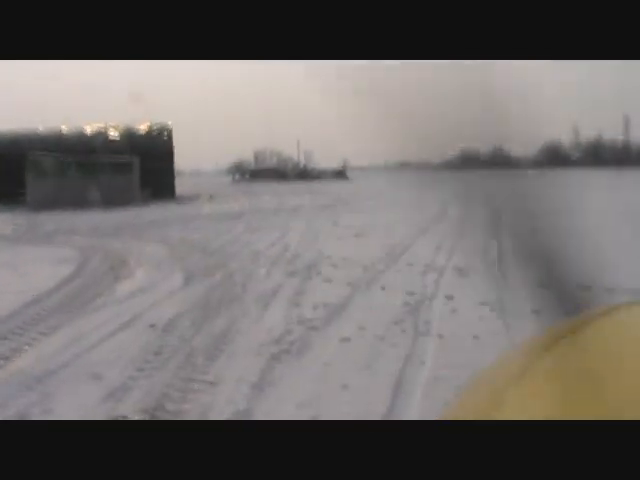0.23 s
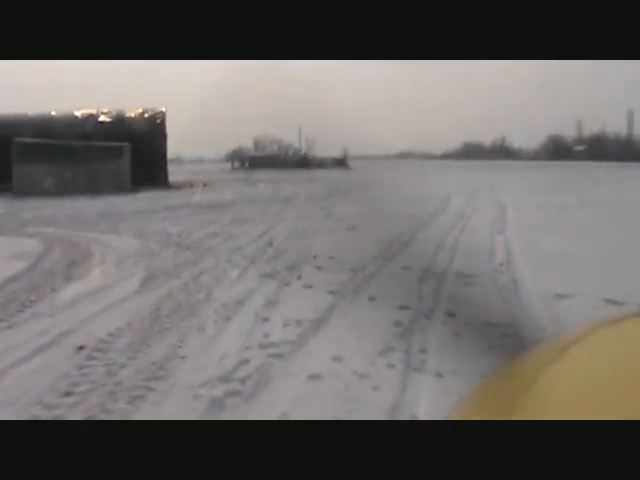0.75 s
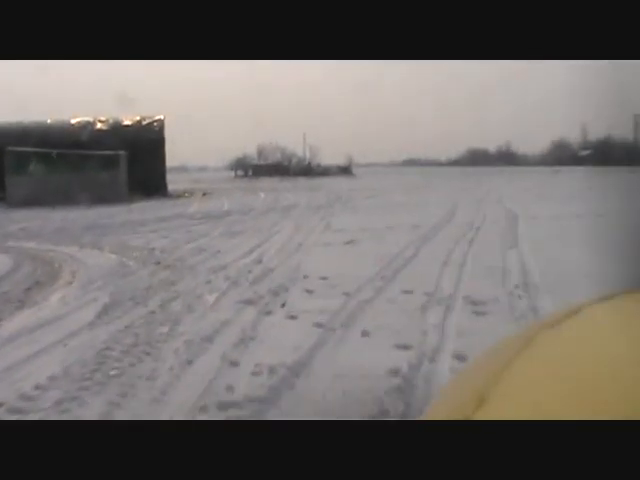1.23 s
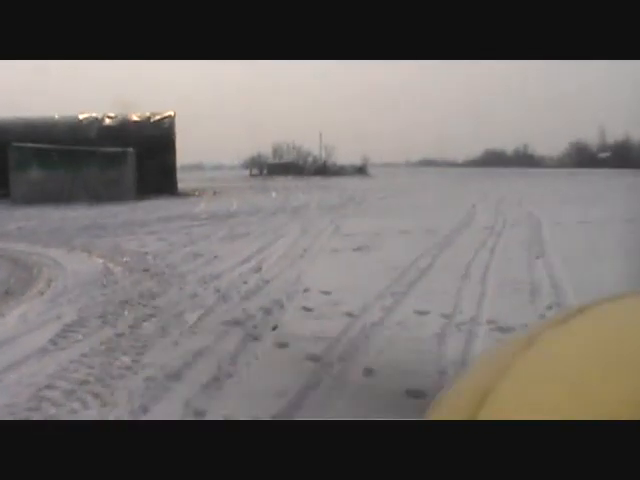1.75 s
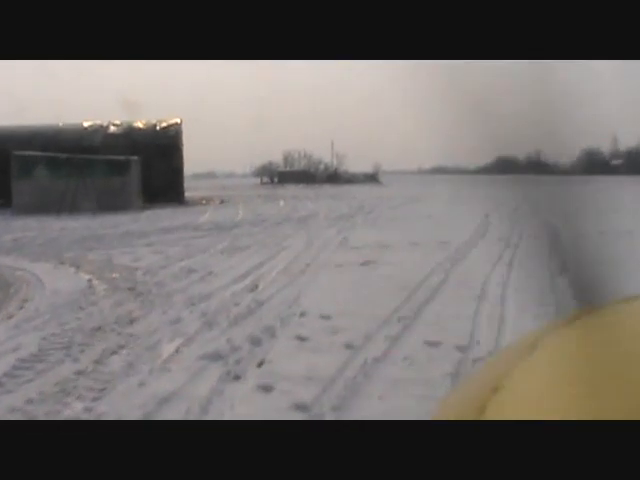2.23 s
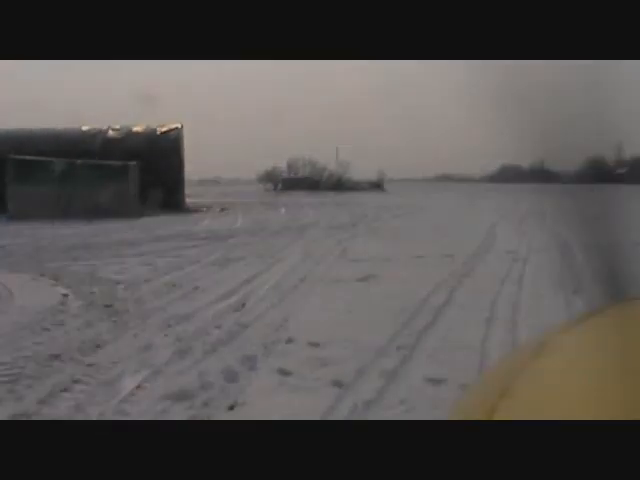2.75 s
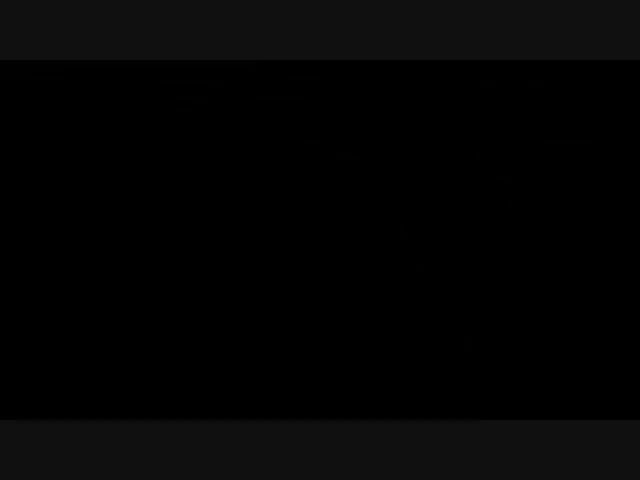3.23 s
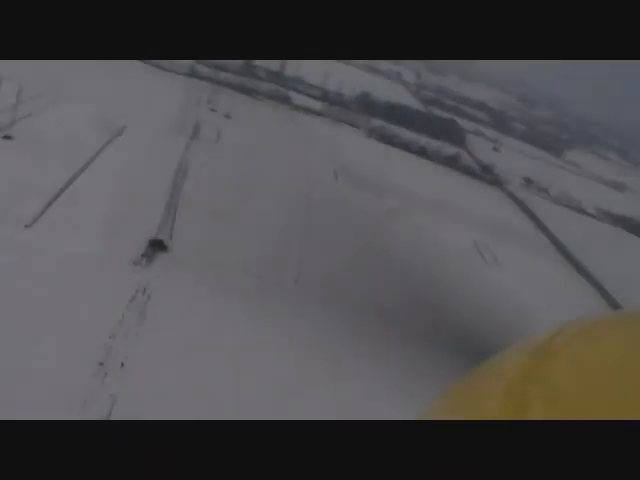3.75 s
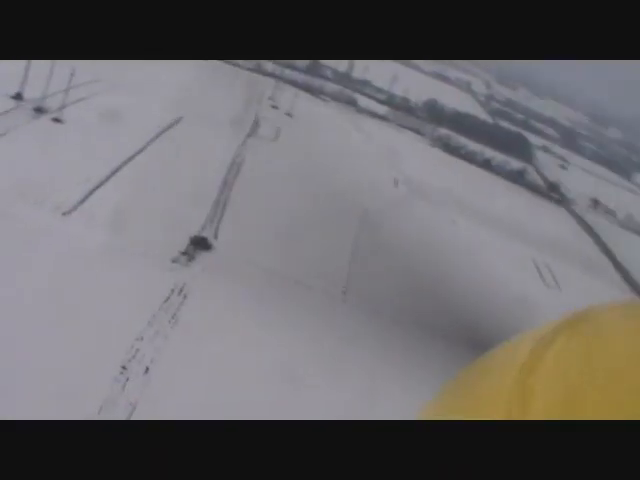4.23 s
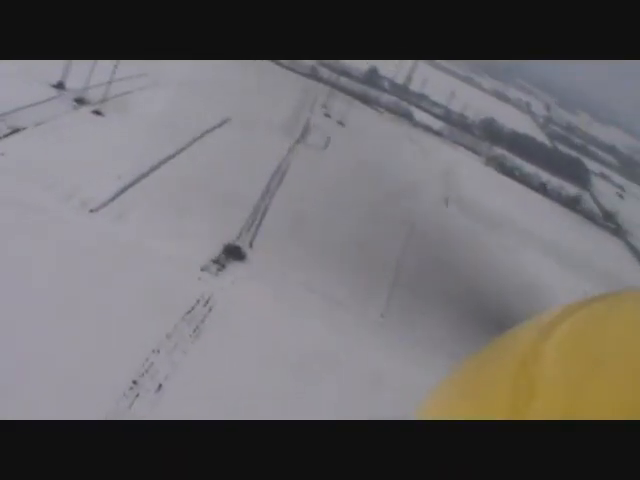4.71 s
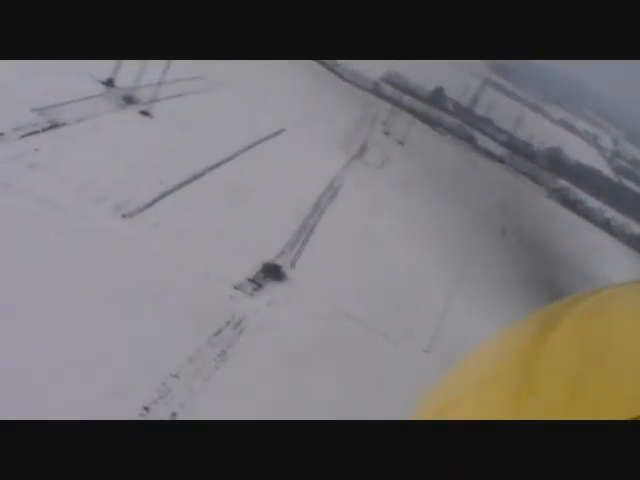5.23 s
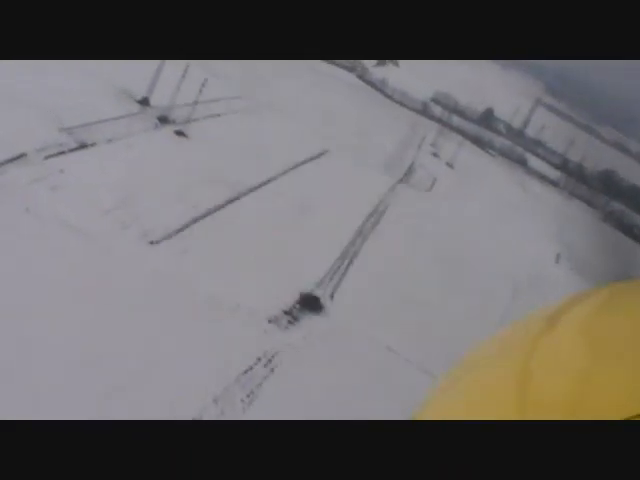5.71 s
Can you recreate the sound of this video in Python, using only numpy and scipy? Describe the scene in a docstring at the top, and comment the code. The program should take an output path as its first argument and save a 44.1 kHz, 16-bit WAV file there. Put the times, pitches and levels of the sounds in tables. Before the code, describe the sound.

A small ultralight aircraft engine heard very close, from its nose, outdoors. From 0 to about 1.4 s it runs at steady taxi power: a low buzzing drone with rapid, dry, hollow knocks and ringing cowling clatter, over throbbing propeller wash and a soft grainy hiss. Its pitch dips slightly, then creeps up. A loose metal fitting rattles in short, bright, irregular ticks and bursts; a very short high squeak slips in near 0.8 s. From 1.4 s everything gradually fades, with a faint thin whistle around 2.8 to 3.2 s. At about 3.2 s there is roughly a quarter second of silence. From 3.4 s the engine fades back in, clearly higher pitched and at climb power, reaching full level near 5.4 s. The rushing air is now stronger and smoother, masking most of the clatter, with softer, sparser rattles continuing until the end at about 6 s.

```python
"""Engine of an ultralight aircraft, heard from its nose: taxiing over snow, then climbing at higher power.
Firing-locked tones make the drone; knocks and cowling resonances at the firing rate make the clatter.
Coloured noise makes the propeller wash and air hiss; a loose fitting rattles as resonant noise bursts.
The taxi fades and has one scrape and a thin late whistle; after a brief silence the climb fades in."""
import sys
import numpy as np
from scipy import signal
from scipy.fft import rfft, irfft, next_fast_len
from scipy.io import wavfile
from scipy.ndimage import map_coordinates

SR = 44100
rng = np.random.default_rng(int(sys.argv[2]) if len(sys.argv) > 2 else 0)


def transcribe(signal):
    """Save signal, clipped to [-1, 1], as a 16-bit WAV file at the path in sys.argv[1]."""
    frames = np.atleast_2d(signal).T
    limited = np.clip(frames, -1, 1)
    pcm = np.round(limited * 32767).astype(np.int16)
    wavfile.write(sys.argv[1], SR, pcm)


N = 263276
TIME = np.arange(N) / SR  # s


def amp(db):
    """Decibels to gain."""
    return 10 ** (np.asarray(db) / 20)


def unit(x):
    """Scale to rms 1."""
    return x / np.sqrt(np.mean(x ** 2) + 1e-20)


def along(points, hz):
    """Interpolate (frequency [Hz], value) points on a log frequency axis."""
    point_hz, value = np.transpose(points)
    return np.interp(np.log(hz + 1), np.log(point_hz + 1), value)


def curves(rows):
    """One value per sample for each column after the time."""
    time_s, *columns = np.transpose(rows)
    return [np.interp(TIME, time_s, column) for column in columns]


def wobble(knots_per_s):
    """Smooth random curve: a spline through normal deviates."""
    knots = rng.standard_normal(int(N * knots_per_s / SR) + 4)
    return map_coordinates(knots, [TIME * knots_per_s])


def filtered(x, response):
    """Apply a complex frequency response by zero-padded FFT."""
    size = next_fast_len(N + SR // 2)
    hz = np.fft.rfftfreq(size, 1 / SR)
    return irfft(rfft(x, size) * response(hz), size)[..., :N]


def coloured(x, spectrum):
    """Shape x to a spectrum, 12 dB/octave down below it and 24 dB/octave above, at rms 1."""
    low_hz, high_hz = spectrum[0][0], spectrum[-1][0]

    def response(hz):
        below = np.minimum(hz / low_hz, 1) ** 2
        above = (high_hz / np.maximum(hz, high_hz)) ** 4
        return amp(along(spectrum, hz)) * below * above

    return unit(filtered(x, response))


def ringing(x, modes):
    """Sum of band-pass resonances of alternating sign, scaled to keep the power of white noise."""
    def body(hz):
        total = 0
        for k, (centre_hz, width_hz, db) in enumerate(modes):
            damping = 1j * hz * width_hz
            total = total + (-1) ** k * amp(db) * damping / (centre_hz ** 2 - hz ** 2 + damping)
        return total

    def response(hz):
        gain = body(hz)
        return gain / np.sqrt(np.mean(abs(gain) ** 2))

    return filtered(x, response)


def noise_pair(alike):
    """Left and right white noise with a given correlation at each frequency."""
    def mid_side(hz):
        angle = np.arccos(np.clip(along(alike, hz), -1, 1)) / 2
        return np.array([np.cos(angle), np.sin(angle)])

    mid, side = filtered(rng.standard_normal((2, N)), mid_side)
    return np.array([mid + side, mid - side])


def strokes(cycle, lag, sharp, scatter_db):
    """One smooth pulse per firing, lag in cycles, each of random size, at rms 1."""
    index = np.maximum(np.floor(cycle - lag + .5).astype(int) + 1, 0)
    size = amp(scatter_db * rng.standard_normal(N)[index])
    return unit(size * np.exp(sharp * np.cos(2 * np.pi * (cycle - lag))))


def bursts(events, rise_s, t60_s):
    """Envelope that swells and decays at each (time [s], level [dB]) event."""
    t = np.arange(SR // 4) / SR
    shape = (1 - np.exp(-(t / rise_s) ** 2)) * 1000 ** (-t / t60_s)
    time_s, db = np.transpose(events)
    hits = np.bincount(np.round(time_s * SR).astype(int), amp(db), N)[:N]
    return signal.fftconvolve(hits, shape / shape.max())[:N]


def drone(cycle, orders, waver_db, jitter_rad):
    """Tones locked to the crankshaft; uneven combustion makes each waver in level and phase."""
    total = 0
    for order, db in orders:
        level = amp(db + waver_db * wobble(11))
        quarter_order = np.round(order * 4) / 4
        jitter = jitter_rad * np.sqrt(quarter_order) * wobble(9)
        total = total + level * np.cos(2 * np.pi * quarter_order * cycle + jitter)
    return total


def airflow(cycle, air, wash, hiss, alike, throb, gust_db):
    """Uneven propeller wash, throbbing at the firing rate, under a finer, grainy hiss."""
    wash_db, hiss_db = curves(air)
    gust = wobble(55)
    beat = strokes(cycle, lag=0.47, sharp=throb, scatter_db=0.0)
    roar = coloured(noise_pair(alike) * beat * amp(gust_db * gust), wash)
    grain_db = .5 * gust_db * gust + 1.62 * wobble(200)
    fizz = coloured(noise_pair(alike) * amp(grain_db), hiss)
    eddies_per_s, eddy_db = 7, .5  # slow swell, drawn separately for wash and hiss
    wash_swell_db = eddy_db * wobble(eddies_per_s)
    hiss_swell_db = eddy_db * wobble(eddies_per_s)
    return amp(wash_db + wash_swell_db) * roar + amp(hiss_db + hiss_swell_db) * fizz


def recurring(cycle, alike, count):
    """Moving parts repeat the same noise every count firings, giving a comb of fine lines."""
    place = cycle % count * N / cycle[-1]
    return unit(np.array([map_coordinates(side, [place]) for side in noise_pair(alike)]))


def clatter(cycle, alike, knock_db, ring_db, sharp, steady):
    """Every firing gives a dry knock, alternately hard and soft, and keeps the cowling ringing."""
    # knock colour: (frequency [Hz], relative density [dB])
    knock_colour = [(1000, -12.5), (1250, -12.5), (1380, 14), (1450, -17), (1550, 11.5), (1640, 0),
                    (1730, -27), (1900, -17), (2700, -16.5), (3300, -12.5)]
    # cowling resonances: (centre [Hz], width [Hz], relative gain [dB])
    cowling = [(184, 71, 3), (334, 62, 3), (457, 71, -2), (605, 13, -4), (808, 28, 2), (839.4, 24, 9.5),
               (914, 95, -4), (1062, 83, -7.5)]
    knock_hz = 1550

    def machinery(count):  # steady = share of power that recurs
        repeated = recurring(cycle, alike, count)
        return np.sqrt(steady) * repeated + np.sqrt(1 - steady) * noise_pair(alike)

    ping = unit(np.sin(2 * np.pi * knock_hz * TIME + 1.5 * wobble(80)))
    alternation = 1 + .18 * np.sin(np.pi * cycle)
    blows = strokes(cycle, lag=.53, sharp=sharp, scatter_db=.7) * alternation
    scuff = coloured(machinery(count=2), knock_colour)
    knocks = blows * (amp(-2) * ping + amp(-6) * scuff)
    shakes = machinery(count=4) * strokes(cycle, lag=0.22, sharp=0.53, scatter_db=0.0)
    return amp(knock_db) * knocks + amp(ring_db) * unit(ringing(shakes, cowling))


def strikes(cycle):
    """(time [s], level [dB]) of each contact, in step with the engine, hardest mid-bout on average."""
    # rattling bouts, the shortest a single hard tick: (start [s], length [s], nominal level [dB])
    bouts = [(0.06, .01, -23), (0.181, .07, -19), (0.306, .07, -18.5), (0.467, .01, -21.5), (0.6, .07, -18),
             (0.722, .01, -14), (0.816, .01, -17.5), (0.880, .01, -21.5), (1.002, .17, -16),
             (1.371, .01, -12.5), (1.493, .10, -17), (1.641, .01, -18.5), (1.705, .07, -19),
             (1.825, .07, -18), (2.101, .04, -15.5), (2.224, .20, -18), (2.468, .01, -18),
             (2.623, .07, -18), (2.747, .01, -21.5), (2.838, .10, -17.5), (3.13, .01, -25),
             (3.44, .01, -16), (3.6, .04, -20), (3.705, .09, -18.5), (3.971, .12, -20.5),
             (4.211, .06, -19.5), (4.418, .06, -17.5), (4.658, .04, -20), (5.074, .06, -20.5),
             (5.34, .04, -22.5), (5.525, .06, -23), (5.758, .04, -16)]
    firings_per_strike = 2
    bout_edge_db, strike_scatter_db, graze_db = -1.5, 2.1, -14
    events = []
    for start_s, length_s, db in bouts:
        first, last = np.interp([start_s, start_s + length_s], TIME, cycle)
        hard = np.arange(first, last, firings_per_strike)
        # grazes: before, between and after the hard strikes
        soft = np.r_[first - firings_per_strike, hard[1:] - 1, hard[-1] + firings_per_strike]
        off_middle = (2 * np.arange(len(hard)) + 1) / len(hard) - 1
        level_db = db + np.r_[bout_edge_db * off_middle ** 2, np.full(len(soft), graze_db)]
        level_db = level_db + strike_scatter_db * rng.standard_normal(len(level_db))
        time_s = np.interp(np.r_[hard, soft], cycle, TIME)
        events += zip(time_s, level_db)
    return events


def rattle(cycle):
    """In each bout a loose fitting strikes every second firing, exciting its ring and a dry crack."""
    # fitting resonances: (centre [Hz], width [Hz], relative gain [dB])
    fitting_modes = [(3970, 180, 7.5), (4380, 84, 3.5), (4880, 340, -1.5), (5450, 71, 1.5), (6140, 590, 1),
                     (7570, 260, 0), (8020, 410, 0.5), (9430, 290, 1.5), (10010, 210, 0.5),
                     (11320, 570, 1.5), (11560, 360, 3), (12270, 300, -7), (13200, 600, -7.5),
                     (13740, 490, -12)]
    # crack response: (frequency [Hz], gain [dB])
    crack_colour = [(2000, -34.5), (5000, -11), (9000, -7.5), (11500, 3.5), (13000, 5), (16000, -10)]
    # left-right correlation: (frequency [Hz], correlation [-1..1])
    fitting_alike = [(4000, .1), (6000, 0.45), (8000, 0.34), (11000, 0.81)]
    hits = strikes(cycle)
    ticks = bursts(hits, rise_s=0.00098, t60_s=0.0042)
    tails = amp(-14.5) * bursts(hits, rise_s=0.0034, t60_s=0.04)
    chatter = amp(-32) * bursts(hits, rise_s=0.004, t60_s=0.35)
    chatter = chatter * strokes(cycle, lag=.06, sharp=3, scatter_db=6)
    envelope = ticks + tails + chatter
    # independent level wobbles vary the balance of ring and crack
    ring_gain = amp(-2.0 + wobble(30))
    ring = ring_gain * ringing(noise_pair(fitting_alike) * envelope, fitting_modes)
    crack_gain = amp(-3.5 + 0.78 * wobble(30))
    crack_noise = noise_pair(fitting_alike) * envelope
    crack = crack_gain * filtered(crack_noise, lambda hz: amp(along(crack_colour, hz)))
    return ring + crack


def scrape():
    """A short, high squeak of the fitting sliding on its seat: a resonant noise burst."""
    # slip: (time [s], level [dB])
    slips = [(0.772, -22)]
    rub = noise_pair([(11000, 0.59)]) * bursts(slips, rise_s=0.0033, t60_s=0.1)
    # (centre [Hz], width [Hz], relative gain [dB])
    return ringing(rub, [(9800, 1400, -16.5), (11600, 410, -8.5), (12800, 800, -18.0)])


def whistle():
    """Two thin tones with a shared slight pitch wander swell late in the taxi."""
    # tones: (mean frequency [Hz], level before swell [dB])
    whistle_tones = [(2912, -52), (4366, -49)]
    # swell: (time [s], gain [dB])
    whistle_swell = [(2.7, -28), (2.85, 8), (3.0, 3), (3.04, -12), (3.1, 2), (3.19, 9)]
    swell_db, = curves(whistle_swell)
    clock_s = TIME + np.cumsum(0.00097 * wobble(40)) / SR
    gain = amp(swell_db + 2 * wobble(32))
    return gain * sum(amp(db) * np.sin(2 * np.pi * hz * clock_s) for hz, db in whistle_tones)


def taxi(cycle, load_gain):
    """Lower power: a clear drone and a distinct clatter, with the scrape and whistle."""
    # airflow: (time [s], wash level [dB], hiss level [dB])
    taxi_air = [(0, -15, -35), (1.4, -15.8, -35.4), (3.1, -16.5, -35.5)]
    # wash and hiss colours: (frequency [Hz], relative density [dB])
    taxi_wash = [(20, -24), (32, -3.5), (48, -12), (77, -6.5), (100, 0.5), (190, -2), (300, -7), (400, -10),
                 (600, -10.5), (740, -19), (1000, -17.5), (1250, -23.5), (1650, -24.5), (2200, -45.5)]
    taxi_hiss = [(1200, -11), (1900, 3.5), (2300, 1), (2700, 2.5), (3050, 1.5), (3400, -2.5), (4000, -3.5),
                 (5200, -9), (7500, -12), (9000, -10), (11800, -13), (13000, -19), (14000, -17),
                 (16000, -29)]
    # left-right correlation: (frequency [Hz], correlation [-1..1])
    taxi_alike = [(30, .93), (70, 0.78), (130, 0.52), (300, 0.78), (600, 0.49), (1500, 0.65), (4000, 0.43),
                  (8000, 0.45)]
    # engine tones: (multiple of firing rate, level before load gain [dB])
    taxi_orders = [(.5, -43.5), (1, -16.5), (1.5, -27), (2, -20), (3, -29.5), (5, -33.5), (7, -44.5),
                   (8, -46.5), (9, -39.5), (10.5, -35.5), (11.75, -38.5), (16, -40.5), (21, -40.5)]
    air = airflow(cycle, taxi_air, taxi_wash, taxi_hiss, taxi_alike, throb=0.044, gust_db=2.0)
    knocking = clatter(cycle, taxi_alike, knock_db=-33.3, ring_db=-25.5, sharp=2.6, steady=.7)
    hum = drone(cycle, taxi_orders, waver_db=1.1, jitter_rad=0.093)
    return air + load_gain * (hum + knocking) + scrape() + whistle()


def climb(cycle, load_gain):
    """Higher power: the stronger airflow covers most of the clatter."""
    # airflow: (time [s], wash level [dB], hiss level [dB])
    climb_air = [(3.5, -15, -30), (4.5, -14, -28.5), (5.9, -15, -29.5)]
    # wash and hiss colours: (frequency [Hz], relative density [dB])
    climb_wash = [(20, -28), (33, -4), (60, -6), (100, -1.5), (170, -1), (330, -4.5), (400, -8.5),
                  (600, -10), (760, -19), (930, -17.5), (1250, -23.5), (1700, -33), (2300, -44.5)]
    climb_hiss = [(1500, -5), (1950, -3), (2400, -5), (2620, 0), (3100, -2), (3350, -8), (3950, -5),
                  (5300, -9.5), (6600, -9.5), (7550, -13), (8300, -10.5), (10200, -11.5), (11400, -16.5),
                  (12150, -13.5), (13200, -21), (16000, -23)]
    # left-right correlation: (frequency [Hz], correlation [-1..1])
    climb_alike = [(30, .93), (70, 0.83), (130, 0.38), (300, 0.79), (600, 0.52), (1500, 0.52), (4000, 0.43),
                   (8000, 0.48)]
    # engine tones: (multiple of firing rate, level before load gain [dB])
    climb_orders = [(.5, -34), (.75, -27), (1, -24), (1.5, -29.5), (2, -19.5), (2.25, -32), (7.5, -45),
                    (10.75, -38), (11, -38.5), (11.25, -34), (12, -46.5), (13, -44)]
    air = airflow(cycle, climb_air, climb_wash, climb_hiss, climb_alike, throb=.15, gust_db=0.48)
    knocking = clatter(cycle, climb_alike, knock_db=-38.5, ring_db=-33.5, sharp=0.76, steady=.45)
    hum = drone(cycle, climb_orders, waver_db=1.4, jitter_rad=.13)
    return air + load_gain * (hum + knocking)


def scene():
    """Taxi, a short silence, then climb, under a linear fade down and up."""
    # engine speed: (time [s], firing rate [Hz])
    firing_rate = [(0, 62.15), (0.3, 60.99), (0.6, 63.12), (0.9, 64.18), (1.3, 65.75), (1.7, 65.93),
                   (2.2, 65.1), (2.7, 65.79), (3.19, 65.98), (3.4, 77.31), (4.1, 75.58), (4.6, 75.91),
                   (5.2, 76.48), (5.97, 76.47)]
    # engine loudness: (time [s], gain [dB])
    engine_load = [(0, -1.5), (.5, -0.5), (1.8, -0.84), (3.1, 0), (3.5, -0.5), (4.3, -1.5), (5.2, 1.5),
                   (5.9, 1.5)]
    taxi_end_s, fade_bottom_s, climb_start_s, fade_s = 3.193, 3.39, 3.43, 2.0
    cycle = np.cumsum(curves(firing_rate)[0]) / SR  # firings elapsed
    load_gain = amp(curves(engine_load)[0])
    fade = np.minimum(abs(TIME - fade_bottom_s) / fade_s, 1)
    fitting = rattle(cycle)
    ground = (TIME < taxi_end_s) * (taxi(cycle, load_gain) + fitting)
    flight = (TIME > climb_start_s) * (climb(cycle, load_gain) + fitting)
    return fade * (ground + flight) * amp([[-.25], [.25]])  # left, right


def record(dry):
    """Round off the highest peaks, then remove everything above the band limit."""
    ceiling, top_hz = .85, 15900
    rounded = dry / (1 + (dry / ceiling) ** 6) ** (1 / 6)
    return filtered(rounded, lambda hz: hz < top_hz)


dry = scene()
out = record(dry)
transcribe(out)
```